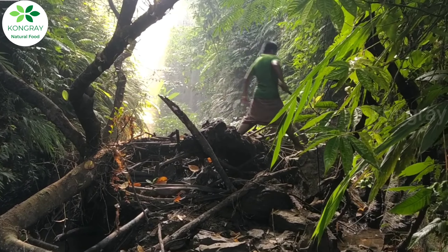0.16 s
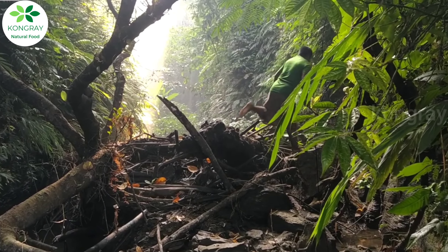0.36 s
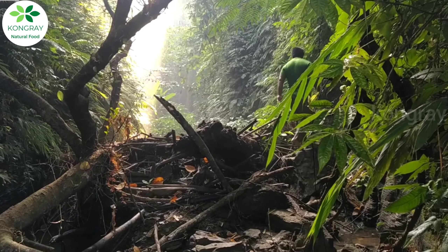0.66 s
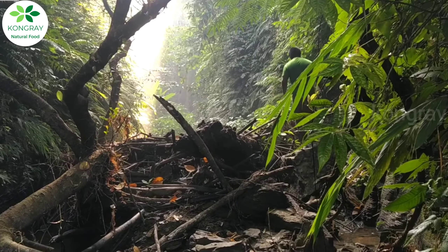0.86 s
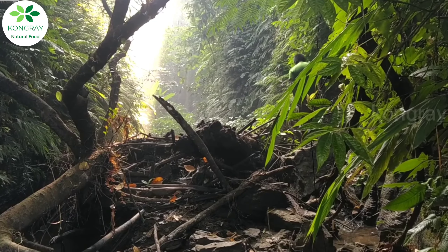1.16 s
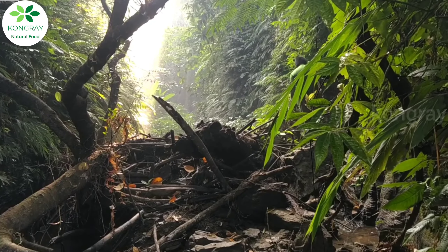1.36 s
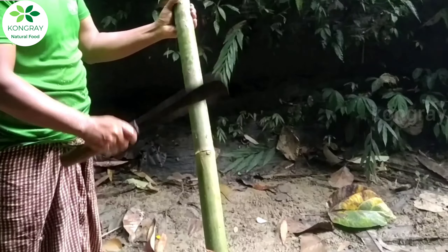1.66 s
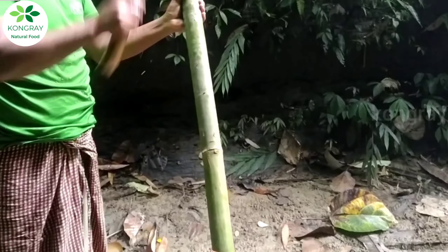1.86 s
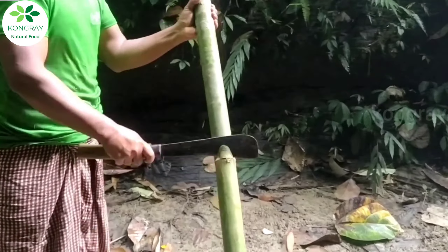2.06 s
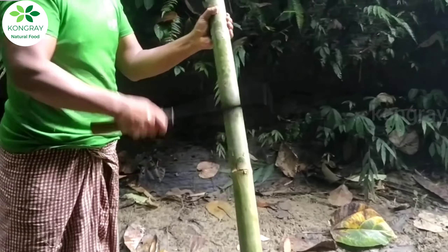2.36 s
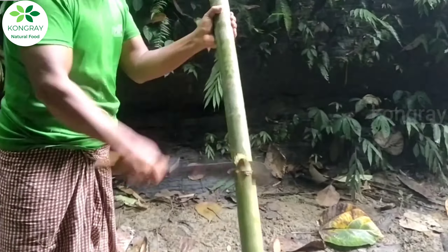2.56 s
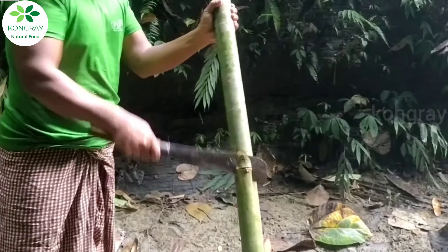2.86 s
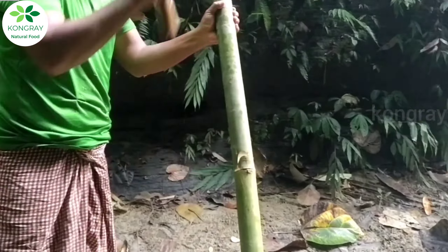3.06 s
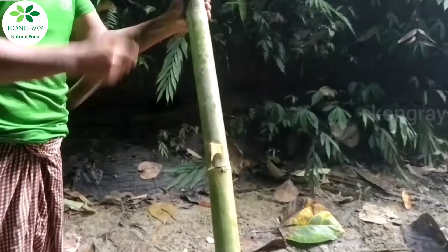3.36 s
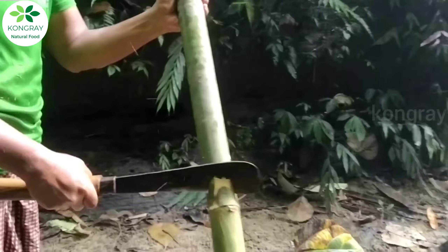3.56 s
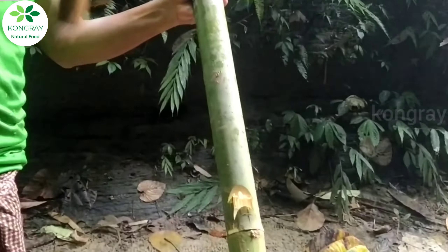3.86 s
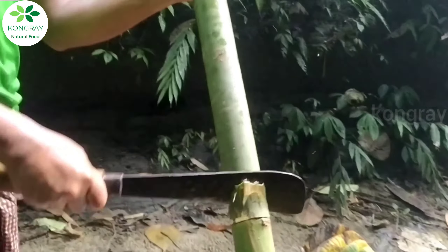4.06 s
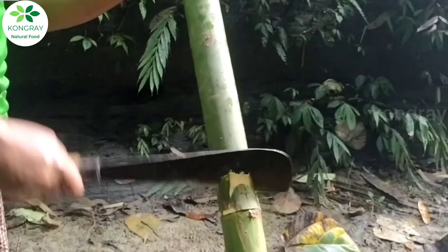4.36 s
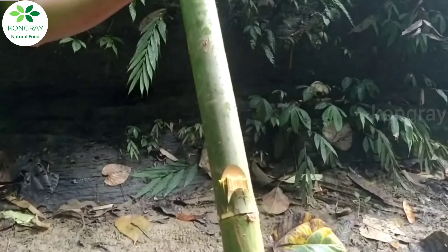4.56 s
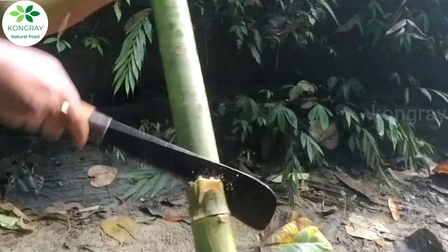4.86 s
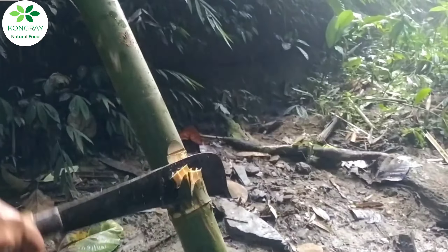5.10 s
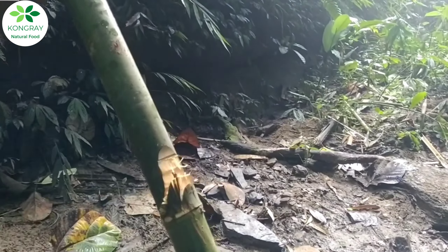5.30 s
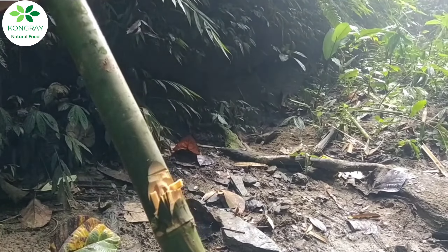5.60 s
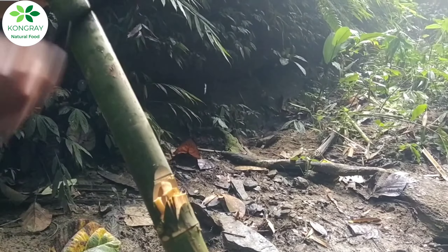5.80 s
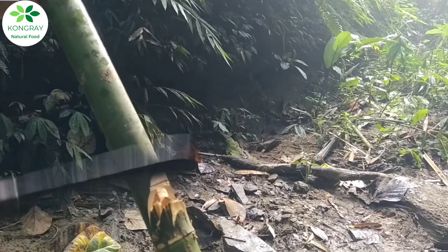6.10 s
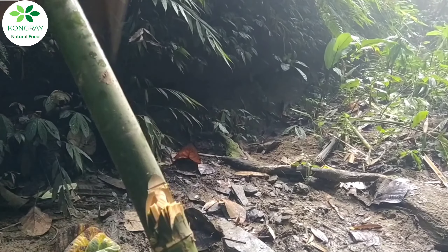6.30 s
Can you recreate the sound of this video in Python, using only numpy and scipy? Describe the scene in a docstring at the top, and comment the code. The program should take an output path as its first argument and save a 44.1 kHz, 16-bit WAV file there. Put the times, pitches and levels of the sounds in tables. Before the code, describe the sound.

A machete hacks at a bamboo cane in a quiet forest. The first four knocks are distant and soft, then the sound drops out for an instant. A dozen loud, close chops follow, about two or three a second, each splitting fibres, snapping splinters and briefly ringing the hollow stem. The trees return a quick echo, while leaves swish and bits of wood fall lightly over a faint hush of air.

```python
"""A heavy blade chops green bamboo in a forest: four blows far off, a short silence, then twelve close by.
Each blow cracks, tears fibres, snaps splinters, knocks the hollow cane and echoes in the trees.
Shaken leaves rustle, crumbs patter and chips tick on the ground, over a steady hush of air.
Cracks, echoes and leaves are shaped noise; the cane and the small bits ring after a short push."""
import sys
import numpy as np
from scipy import signal
from scipy.io import wavfile

SR = 44100
rng = np.random.default_rng(int(sys.argv[2]) if len(sys.argv) > 2 else 0)


def materialize(psi):
    """Save the field psi as 16-bit PCM at rate SR to the path in sys.argv[1].

    A 1-D psi becomes a single channel; in a 2-D psi each row is a channel.
    """
    bounded = np.clip(np.atleast_2d(psi).T, -1, 1)
    quanta = np.round(bounded * 32767).astype(np.int16)
    wavfile.write(sys.argv[1], SR, quanta)


N = 284004

# One row per blow. "Lift" turns the treble up or down; "pan" is left level minus right level.
# t/s, crack/dB, tearing/dB, tearing length/s, lift/dB, echo/dB, midrange pan/dB, treble pan/dB,
# shaken leaves/dB, knock delay/s, thud/dB, thud pitch/Hz, ring/dB, ring pitch/Hz
BLOWS = np.array([(0.063, -52, -36, 0.066, -15.5, -2.5, -0.5, -1.5, -48, 0.0012, -40.5, 235, -41.5, 1210),
                  (0.476, -40, -46, 0.078, -13, -4.5, -2, -6, -53, 0.0023, -34.5, 250, -37.5, 560),
                  (1.036, -53, -52, 0.067, -1, -4.5, -4, 2, -52.5, .0011, -33.5, 235, -53, 645),
                  (1.435, -65, -43.5, 0.075, -12.5, -4, -1, -2, -54, 0.0011, -35, 235, -41.5, 697),
                  (1.719, 1, -55, 0.026, -20, -7, 12, -18, -45, 0.00082, -24, 292, -16.5, 1365),
                  (2.066, -8, -16.5, 0.048, -2.5, -3.5, 6.5, 5, -35, 0.0043, -37, 270, -19.5, 1220),
                  (2.648, -6.5, -20.5, 0.046, -2, -0.5, 1, 26, -32.5, 0.0055, -46, 270, -19, 1260),
                  (3.252, -4, -27, 0.058, -4, -1.5, 5, 18, -35, 0.0016, -17.5, 400, -18, 1290),
                  (3.597, -3.5, -21, 0.048, -2.5, -9.5, 5.5, -6, -29, 0.003, -29.5, 310, -28.5, 645),
                  (4.058, -0.5, -16.5, 0.047, -9.5, -4, 0.5, 30, -33, 0.0052, -19, 330, -28, 690),
                  (4.691, -4, -16.5, 0.023, -7, -1.5, -5.5, 22, -36, 0.004, -23, 235, -24, 1480),
                  (4.905, -16.5, -16.5, 0.023, -4.5, 4, 10.5, -5, -34.5, .0048, -26.5, 235, -27, 1140),
                  (5.445, -7, -19, 0.046, -0.5, -5.5, 3.5, 5, -36.5, 0.0075, -29.5, 235, -22.5, 850),
                  (5.718, -7.5, -20.5, 0.033, 0, -7.5, -1, 21, -36, 0.0046, -31, 320, -29, 656),
                  (5.991, -5, -21.5, 0.033, -1, -8.5, 5.5, 33, -34.5, 0.013, -24, 320, -17, 833),
                  (6.358, -3, -23, 0.048, -6, -4, 2, 38, -27, 0.0074, -18, 245, -20.5, 954)])
(START, CRACK_DB, TEAR_DB, TEAR_S, LIFT_DB, ECHO_DB, MID_PAN_DB, TOP_PAN_DB,
 SHAKE_DB, KNOCK_DELAY_S, THUD_DB, THUD_HZ, RING_DB, RING_HZ) = range(14)
# How alike scattered sound is on the left and right: f/Hz, likeness (1 = the same)
SCATTERED_LIKENESS = [(100, 0.19), (500, 0.74), (1000, 0.057), (4000, 0.033), (12000, 0.077)]
SILENCE_START_S, SILENCE_END_S = 1.497, 1.624


def amp(db):
    """Turn decibels into a gain."""
    return 10 ** (np.asarray(db) / 20)


def at_hz(table, hz):
    """Read a table between its rows, on a scale of octaves."""
    pitches, values = np.transpose(table)
    return np.interp(np.log(hz), np.log(pitches), values)


def burst(start, rise, hold, t60):
    """A level that rises, holds and dies away. Here and below, t60 is the seconds taken to fall 60 dB."""
    t = np.arange(N) / SR - start
    return np.clip(t / rise, 0, 1) ** 2 * amp(-60 * np.clip(t - rise - hold, 0, 4 * t60) / t60)


def flicker(hz):
    """A random wobble of typical size 1, mostly slower than hz."""
    keep = np.exp(-2 * np.pi * hz / SR)
    wobble = signal.lfilter([1], [1, -2 * keep, keep * keep], rng.standard_normal(N))
    return wobble / wobble.std()


def ring(push, hz, t60):
    """A resonance: each click in the push starts a dying tone."""
    keep, angle = amp(-60 / (t60 * SR)), 2 * np.pi * hz / SR
    return signal.lfilter([0, np.sin(angle)], [1, -2 * keep * np.cos(angle), keep * keep], push + 1e-18)


def no_bass(sound, hz):
    """Small things give off no low notes."""
    return signal.sosfilt(signal.butter(2, hz, "high", fs=SR, output="sos"), sound)


def noise_bands(colour, likeness=SCATTERED_LIKENESS, level=1):
    """Stereo noise in half-octave bands, as (centre pitch, band); colour shares out the power."""
    white = level * rng.standard_normal((2, 2, N))
    edges = 25 * 2 ** np.arange(0, 9.1, .5)
    centres = np.sqrt(edges[1:] * edges[:-1])
    gains = amp(at_hz(colour, centres))
    gains /= np.sqrt(np.sum(gains ** 2 * np.diff(edges) / (SR / 2)))
    for k, hz in enumerate(centres):
        bandpass = signal.butter(2, edges[k:k + 2], "band", fs=SR, output="sos")
        mid, side = gains[k] * signal.sosfilt(bandpass, white[k % 2] + 1e-18)   # neighbours are unrelated
        alike = at_hz(likeness, hz)
        yield hz, np.sqrt((1 + alike) / 2) * mid + np.sqrt((1 - alike) / 2) * side * [[1], [-1]]


def treble_share(hz):
    """How much of a treble lift a pitch takes: none in the bass, all of it at the top."""
    return np.clip(np.log2(hz / 1010) / 2.55, 0, 1)


def latest(rows, column):
    """At each sample, a value from the newest event, switching 6 ms before it starts."""
    rows = np.array(rows)
    newest = np.searchsorted(rows[:, 0] - .006, np.arange(N) / SR) - 1
    return rows[np.maximum(newest, 0), column]


def panned(sound, pan_db):
    """Turn the left up and the right down, each by half the pan."""
    return sound * amp([pan_db / 2, -pan_db / 2])


def air():
    """The steady hush of the forest."""
    # Colour of the hush: f/Hz, level/dB
    colour = [(15, -35), (25, 3), (127, -9.5), (269, -3), (386, -7), (930, -8.5), (1090, -18.5),
              (1270, -10), (2020, -14), (12000, -15), (15600, -44), (22000, -120)]
    return amp(-66) * sum(band for _, band in noise_bands(colour))


def leaf_motion():
    """Leaves stir, shake after each blow and swish: their joint level, lift and pan over time."""
    # Faint stir of the leaves: t/s, level/dB
    stir = [(0, -79.5), (1.5, -74), (1.63, -68.5), (1.9, -58), (2.5, -61), (3.1, -60), (4.0, -60.5),
            (4.5, -64.5), (4.68, -68), (5.3, -56), (5.6, -63), (6.44, -63)]
    # Leaves brushed or cane shifted: t/s, swell/s, hold/s, level/dB, lift/dB, pan/dB
    swishes = [(0.653, .035, .03, -51, -17, 0), (1.913, 0.0084, 0.02, -49, -6, 3),
               (2.297, 0.021, 0.012, -51, 5, 4), (2.345, 0.044, 0.011, -55, 10.5, 2),
               (2.604, .045, 0.0055, -37.5, -17.5, 11), (2.877, 0.072, 0.013, -37.5, 2, 1),
               (2.985, 0.0053, 0.0077, -51, 16, -2), (3.164, 0.015, 0.063, -46, -9.5, 1),
               (3.474, 0.0096, 0.043, -47.5, 1.5, 0.5), (3.793, 0.017, 0.01, -41, 9.5, -1.5),
               (3.84, 0.016, 0.11, -50, -3.5, 4), (4.033, 0.0049, .005, -54.5, 4, 1),
               (4.248, 0.011, 0.029, -42.5, -6.5, 0), (4.36, 0.049, 0.019, -44, -4, 1.5),
               (4.845, .04, 0.022, -39, -3.5, 1), (5.126, 0.033, 0.051, -37.5, -1, 0.5),
               (5.426, .01, .01, -43, -5, 8), (5.684, 0.0048, 0.0067, -27, -11.5, -2),
               (5.83, 0.033, 0.025, -44, 3, -1), (6.115, 0.024, 0.016, -43, -0.5, -6),
               (6.246, 0.0085, 0.0066, -54, 9.5, -4), (6.303, 0.0066, 0.017, -53.5, 6.5, 2)]
    stirred = amp(np.interp(np.arange(N) / SR, *np.transpose(stir)))
    last_blow = latest(BLOWS, START)
    shaken = sum(amp(blow[SHAKE_DB]) * burst(blow[START], .054, 0, t60=.57) * (last_blow == blow[START])
                 for blow in BLOWS)
    parts = [(stirred, 1, 4), (shaken, -8, 4)]   # level, lift/dB, pan/dB
    parts += [(amp(db) * burst(start, swell, hold, t60=.15), lift, pan)
              for start, swell, hold, db, lift, pan in swishes]
    power = sum(level ** 2 for level, _, _ in parts)
    lift_db = sum(level ** 2 * lift for level, lift, _ in parts) / power
    pan_db = sum(level ** 2 * pan for level, _, pan in parts) / power
    return np.sqrt(power), lift_db, pan_db


def rustle(level, lift_db):
    """Dry leaves rub in uneven patches."""
    # Colour of rubbing leaves: f/Hz, level/dB
    colour = [(35, -48.5), (60, -23), (149, -19), (277, -3), (441, -23), (1120, -11.5), (1530, -9.5),
              (4430, 0.5), (5050, -2.5), (12000, 3.5), (15600, -30), (22000, -120)]
    leaves = sum(band * amp(lift_db * treble_share(hz) + .5 * flicker(hz=12))
                 for hz, band in noise_bands(colour))
    return leaves * level * amp(2.2 * flicker(hz=51))


def crack(lead_in_s=.0037, lead_in_db=-20, t60=.011):
    """Level over time of each crack: a faint, brief lead-in, then the sharp snap."""
    level = 0
    for blow in BLOWS:
        lead_in = amp(lead_in_db) * burst(blow[START] - lead_in_s, lead_in_s, 0, t60)
        snap = burst(blow[START], rise=.0024, hold=.0014, t60=t60)
        level += amp(blow[CRACK_DB]) * (lead_in + snap)
    return level


def tearing():
    """Level over time as the fibres split in ragged jerks."""
    level = sum(amp(blow[TEAR_DB]) * burst(blow[START], .002, blow[TEAR_S], t60=.0067) for blow in BLOWS)
    return level * amp(.38 * flicker(hz=140))


def blade(strength):
    """The direct sound of steel in wood: noise that follows the strength of the blow."""
    # Colour of a blow: f/Hz, level/dB
    colour = [(18, -42), (30, -18), (157, -11.5), (325, 2.5), (510, -40.5), (655, -2), (842, -21),
              (1140, 7.5), (1540, -6.5), (3340, 0.5), (4750, -4), (9580, 4), (12000, 0), (15600, -34),
              (22000, -120)]
    # How alike a blow is on the left and right: f/Hz, likeness (1 = the same)
    likeness = [(100, 1), (500, .9), (1500, 1), (4000, 0.76), (12000, 0.34)]
    lift_db, mid_pan, top_pan = (latest(BLOWS, column) for column in (LIFT_DB, MID_PAN_DB, TOP_PAN_DB))
    sound = 0
    for hz, band in noise_bands(colour, likeness, strength):
        share = treble_share(hz) + np.clip(np.log2(52 / hz), 0, 1)   # a bright blow also shoves more bass
        pan_db = min(hz / 2700, 1) * mid_pan   # the bass stays in the middle
        pan_db += np.clip(np.log2(hz / 3000), 0, 2) / 6.6 * (top_pan - mid_pan)
        sound += amp(lift_db * share) * panned(band, pan_db)
    return sound


def cane(fall_db_per_octave=39.5):
    """The lodging blade rings the hollow cane, most strongly near each blow's thud and ring pitches."""
    # The cane's own tones, in groups that a blow drives together: f/Hz, level/dB, t60/s
    tone_groups = [
        [(145, 0, .24)],
        [(235, 0, .07)],
        [(310, 0, .1), (365, -4, .1)],
        [(645, 0, .08), (710, -4, .06)],
        [(965, 0, .1)],
        [(1125, 0, .1), (1240, -3, .1)],
        [(1420, 0, .07), (1885, -2, .08), (2380, -5, .1)],
    ]
    hits = ((BLOWS[:, START] + BLOWS[:, KNOCK_DELAY_S]) * SR).astype(int)
    hum_db = -29.5 - 3.5 * np.arange(len(hits))[::-1]   # the lowest tone grows as the notch deepens
    sound = np.zeros(N)
    for k, group in enumerate(tone_groups):
        octaves_off = np.abs(np.log2(group[0][0] / BLOWS[:, [THUD_HZ, RING_HZ]]))
        knock_db = (BLOWS[:, [THUD_DB, RING_DB]] - fall_db_per_octave * octaves_off).max(axis=1)
        drive_db = hum_db if k == 0 else knock_db
        for hz, level_db, t60 in group:
            clicks = np.zeros(N)
            clicks[hits] = amp(drive_db + level_db + rng.normal(0, 1.5, len(hits)))
            soft_push = np.hanning(round(.8 * SR / hz))   # about one cycle long
            sound += ring(signal.lfilter(2 * soft_push / soft_push.sum(), 1, clicks), hz, t60)
    return no_bass(sound, hz=130)


def linger(power, t60):
    """Sound caught among the trees: its power builds up and dies away."""
    keep = amp(-120 / (t60 * SR))
    return signal.lfilter([1 - keep], [1, -keep], power + 1e-18)


def splinters(strength, per_second=1500, cycles=34):
    """Torn slivers snap at random and ring, each at its own pitch; the trees hold the sound a while."""
    level = np.sqrt(strength ** 2 + .1 * linger(strength ** 2, t60=.22))
    snaps = level * rng.standard_normal((2, N)) * (rng.random((2, N)) < per_second / SR)
    pitches = np.geomspace(900, 11500, 36)
    chosen = rng.integers(0, len(pitches), (2, N))
    lift_db = latest(BLOWS, LIFT_DB)
    rings = 0
    for k, hz in enumerate(pitches):
        gain = amp(lift_db * treble_share(hz) + 5.5 * np.log2(hz / 3000))
        rings += ring(snaps * (chosen == k) * gain, hz, cycles / hz)
    pile_up = np.sqrt(per_second * cycles / (12 * np.log(10)) * np.mean(1 / pitches))   # rings overlap
    return amp(-8) * panned(no_bass(rings / pile_up, hz=850), latest(BLOWS, MID_PAN_DB))


def echo(strength):
    """Trunks and leaves scatter each blow, and each band dies away at its own pace."""
    # Colour of the echo: f/Hz, level/dB
    colour = [(35, -47.5), (60, -26.5), (378, -8), (504, -13.5), (1250, -7), (1990, -2.5), (2180, -3.5),
              (3550, 1.5), (7880, -2), (12000, -1.5), (15600, -37), (22000, -120)]
    # How long the echo lasts: f/Hz, t60/s
    decay_times = [(100, 0.1), (260, 0.21), (700, 0.18), (1840, 0.34), (4850, 0.27)]
    power = (strength * amp(latest(BLOWS, ECHO_DB))) ** 2
    lift_db, pan_db = latest(BLOWS, LIFT_DB), .081 * latest(BLOWS, TOP_PAN_DB)
    sound = 0
    for hz, band in noise_bands(colour):
        share = treble_share(hz)
        level = np.sqrt(linger(power * amp(2 * lift_db * share), at_hz(decay_times, hz)))
        sound += level * amp(1.5 * flicker(hz=6)) * panned(band, share * pan_db)
    return sound


def patter(leaf_level, per_second=600, cycles=16.6):
    """Crumbs fall among moving leaves and in showers: uneven clicks, each ringing at its own pitch."""
    # Showers of crumbs after a blow: t/s, length/s, level/dB
    showers = [(0.096, 0.19, -62), (1.9, 0.17, -71.5), (3.132, .1, -62.5), (3.475, 0.17, -61),
               (3.654, 0.296, -51), (4.219, .1, -61.5), (5.215, 0.23, -66)]
    shower_level = sum(amp(db) * burst(start, .016, length, t60=.06) for start, length, db in showers)
    level = np.hypot(amp(-13) * leaf_level, shower_level)
    clicks = level * rng.standard_normal(N) * (rng.random(N) < per_second / SR)
    clicks = clicks * amp(rng.normal(0, 4.1, (2, N)))   # each lands more to one side
    pitches = np.geomspace(550, 3500, 14)
    chosen = rng.integers(0, len(pitches), N)
    rings = sum(ring(clicks * (chosen == k), hz, cycles / hz) * amp(3.5 * np.log2(hz / 1500))
                for k, hz in enumerate(pitches))
    return no_bass(rings, hz=500)


def chip_ticks(snap_db=-41):
    """Each chip is a short puff of noise sent twice through one resonance, with a dry snap in front."""
    # The loudest chips and splinters: t/s, peak/dB, f/Hz, ring length/cycles, pan/dB
    chips = [(0.335, -57, 660, 5.5, 4), (1.921, -55, 1150, 27, 0), (2.031, -43.5, 1670, 18, 5),
             (2.528, -50, 2020, 6.5, 5), (2.894, -50, 1170, 7.4, 3), (2.968, -34, 7200, 3.5, -8),
             (2.995, -31.5, 7600, 10, 4), (3.146, -43.5, 3800, 2.7, 4), (3.172, -36, 10400, 8.6, 17),
             (3.184, -39, 10300, 5.9, 11), (3.207, -47, 4060, 4.1, 2), (3.223, -41, 4500, 8.1, 3),
             (3.481, -24.5, 9100, 4.8, 5.5), (3.497, -37.5, 2460, 16, 13), (3.51, -38, 4300, 5.9, -9),
             (3.535, -46, 2280, 8.5, 9), (3.729, -38, 700, 7.3, 3), (3.764, -46, 680, 7.3, -2),
             (3.788, -42.5, 1510, 11, 3), (3.81, -30, 9400, 5.2, -8), (3.82, -33.5, 2850, 6.5, 11),
             (3.874, -53, 1140, 34, 0), (3.914, -58, 550, 3.8, 4), (3.964, -48, 2830, 16, 20),
             (4.27, -35, 3770, 27, -8), (4.437, -49.5, 651, 7.4, 3), (4.572, -57, 3040, 3, 7),
             (5.294, -40.5, 2420, 7.1, 14), (5.338, -35.5, 3280, 8.9, 8), (5.367, -45, 6300, 6.9, 4),
             (5.42, -43, 7100, 3.7, -6), (5.688, -19.5, 2380, 5, 7), (5.859, -34, 5870, 2.4, 1),
             (5.882, -43, 6000, 3, 1), (6.19, -32, 6960, 2.9, 5), (6.257, -42, 3920, 6.1, 2.0),
             (6.282, -60, 326, 8.2, 8), (6.312, -34.5, 3760, 10, 4)]
    sound, t = np.zeros(N), np.arange(round(.08 * SR)) / SR
    for start, peak_db, hz, cycles, _ in chips:
        puff = rng.standard_normal(len(t)) * np.clip(t / .00039, 0, 1) * amp(-60 * t / .024)
        tone = ring(ring(puff, hz, cycles / hz), hz, cycles / hz)
        snap = amp(snap_db) * puff * amp(-60 * t / .0047)
        tick = amp(peak_db) * (tone / np.abs(tone).max() + snap)
        first = round(start * SR)
        sound[first:first + len(t)] += tick[:N - first]
    return panned(sound, latest(chips, column=4))


def air_shove(below_hz=57.6):
    """Each near blow pushes a lump of air onto the microphone; brighter blows push harder."""
    level = sum(amp(-32 + blow[LIFT_DB]) * burst(blow[START], .0029, 0, t60=.049)
                for blow in BLOWS if blow[START] > SILENCE_END_S)
    lowpass = signal.butter(4, below_hz, fs=SR, output="sos")
    mid, side = signal.sosfilt(lowpass, rng.standard_normal((2, N)))
    return level * (mid + .45 * side * [[1], [-1]]) / mid.std()


def scene():
    """Add up the blows, their splinters and echo, the chips, leaves, crumbs and air."""
    strength = np.hypot(crack(), tearing())
    direct = blade(strength) + cane()
    direct[0] = np.roll(direct[0], round(.00019 * SR))   # the blow reaches the left a little later
    chopping = direct + splinters(strength) + echo(strength) + chip_ticks()
    leaf_level, lift_db, pan_db = leaf_motion()
    leaves_and_crumbs = panned(rustle(leaf_level, lift_db) + patter(leaf_level), pan_db)
    return chopping + leaves_and_crumbs + air() + air_shove()


def record(dry):
    """The microphone thins the bass, cuts the top and rounds peaks; silence parts far blows from near."""
    bass_hz, treble_hz, cutoff_hz = 40.6, 12550, 16484
    fade_s, peak_limit = .025, .65
    t = np.arange(N) / SR
    fade = amp(-40 * np.clip(t - SILENCE_START_S, 0, 1) / fade_s)
    sound = signal.sosfilt(signal.butter(1, bass_hz, "high", fs=SR, output="sos"), dry)
    sound *= np.where(t < SILENCE_END_S, fade, 1)
    sound = signal.sosfilt(signal.cheby2(20, 70, treble_hz, fs=SR, output="sos"), sound)
    rounded = sound / (1 + (sound / peak_limit) ** 4) ** .25   # sprays a little sound above the cut
    return signal.sosfilt(signal.cheby2(12, 70, cutoff_hz, fs=SR, output="sos"), rounded)


dry = scene()
out = record(dry)
materialize(out)
```